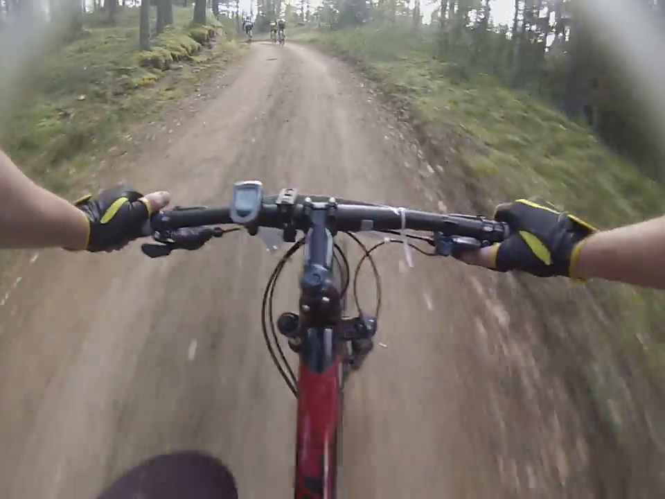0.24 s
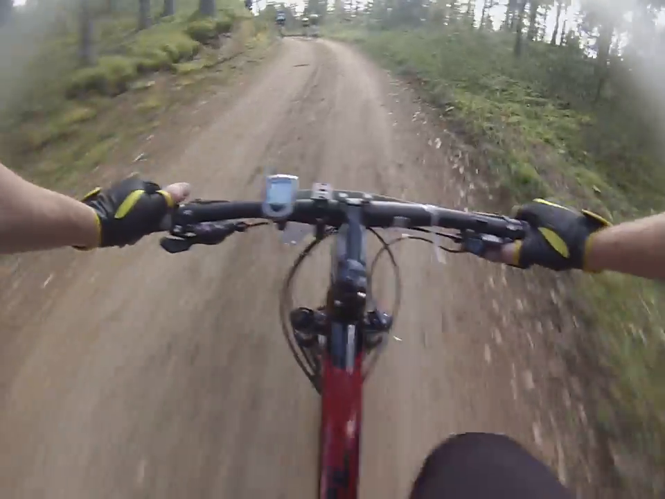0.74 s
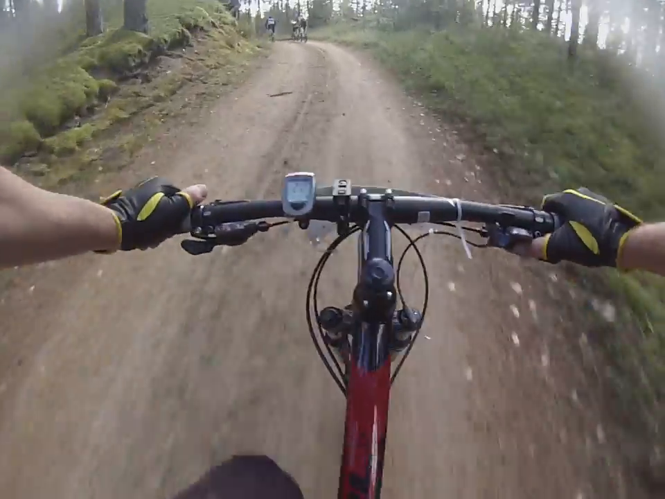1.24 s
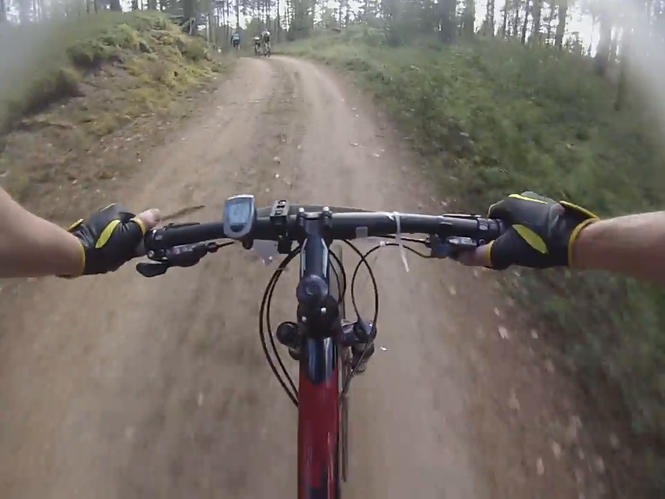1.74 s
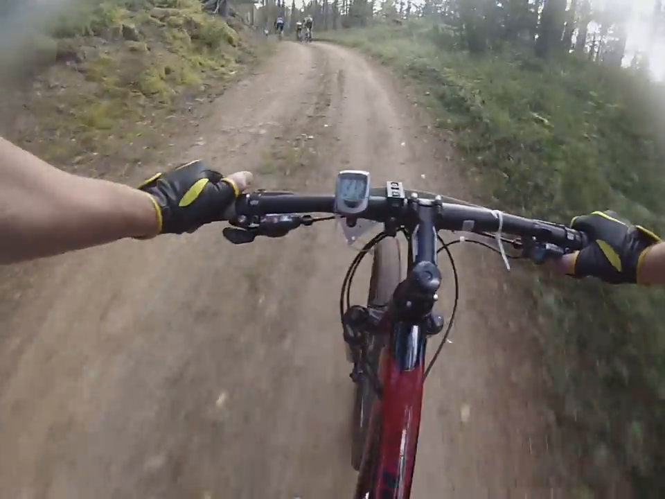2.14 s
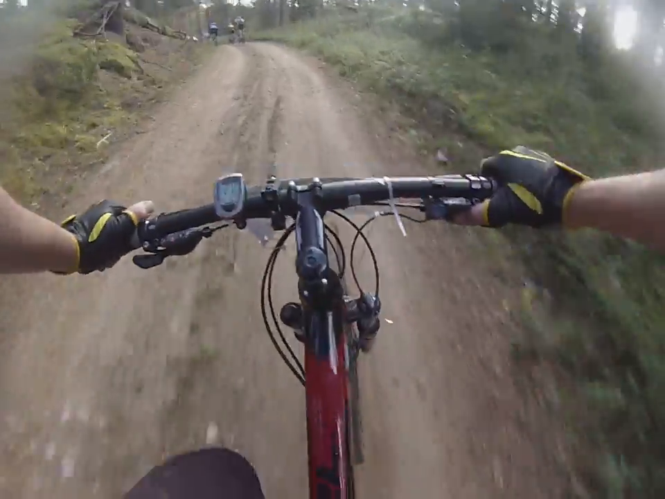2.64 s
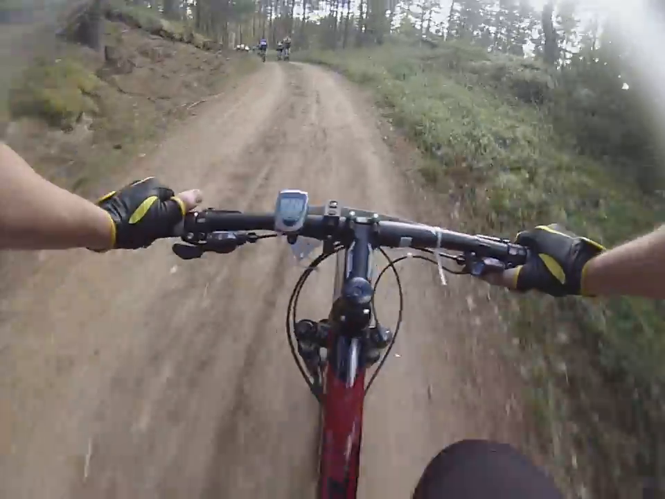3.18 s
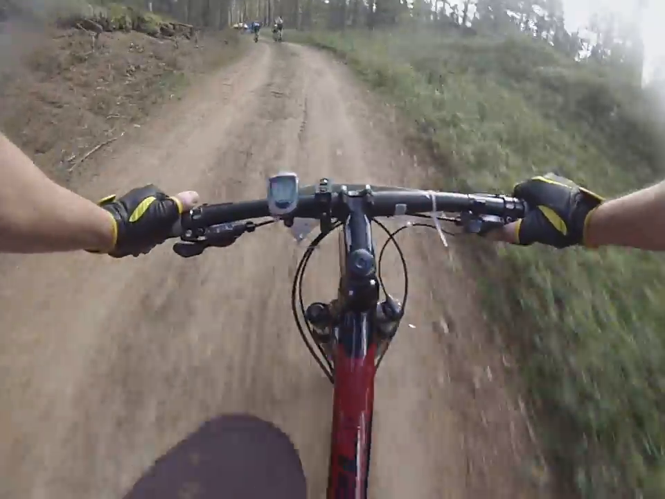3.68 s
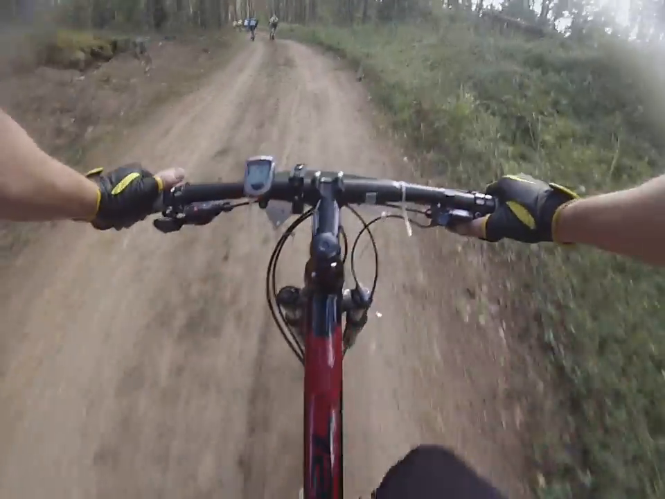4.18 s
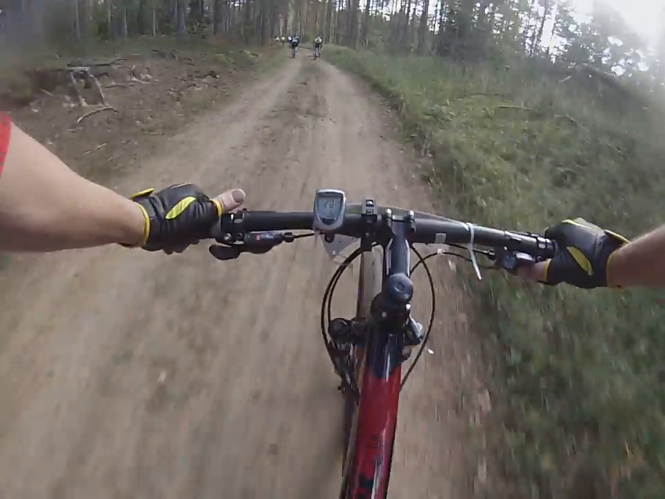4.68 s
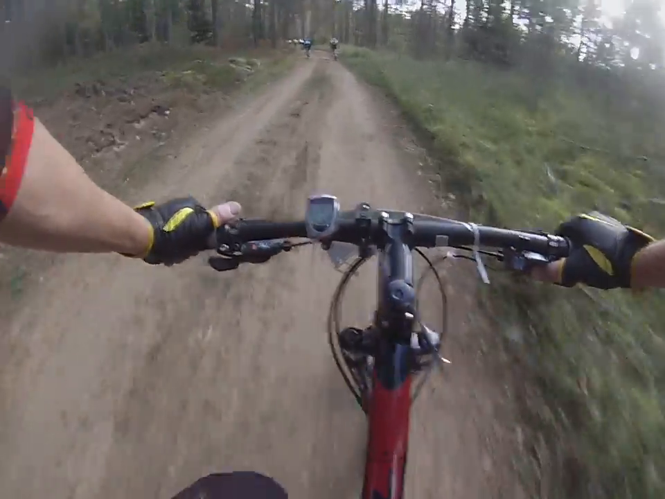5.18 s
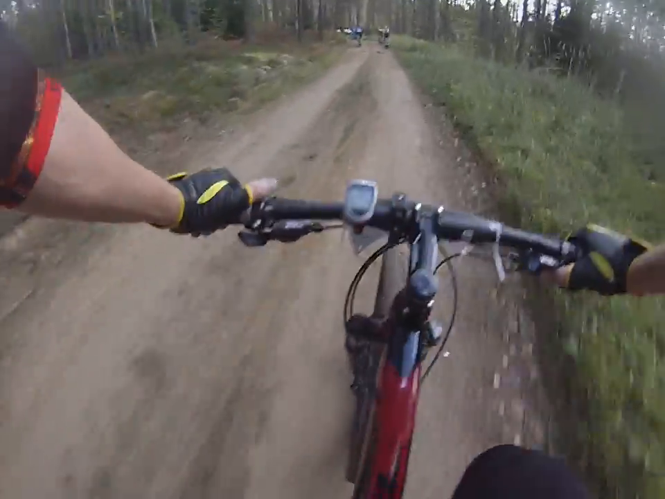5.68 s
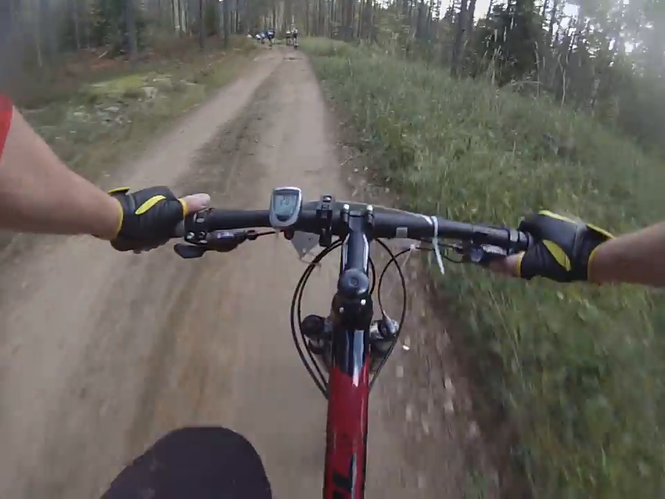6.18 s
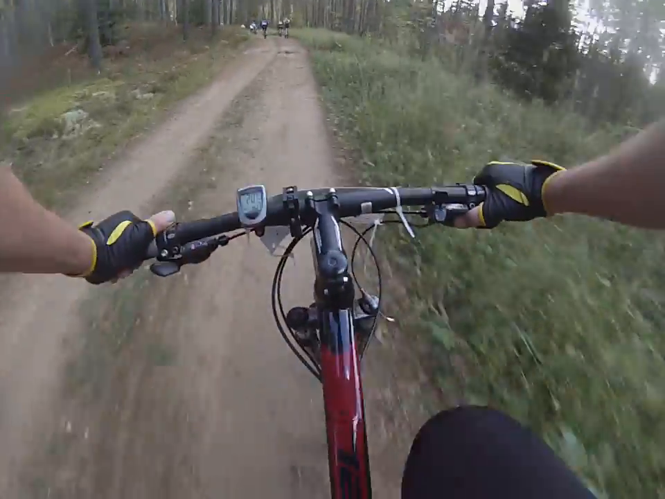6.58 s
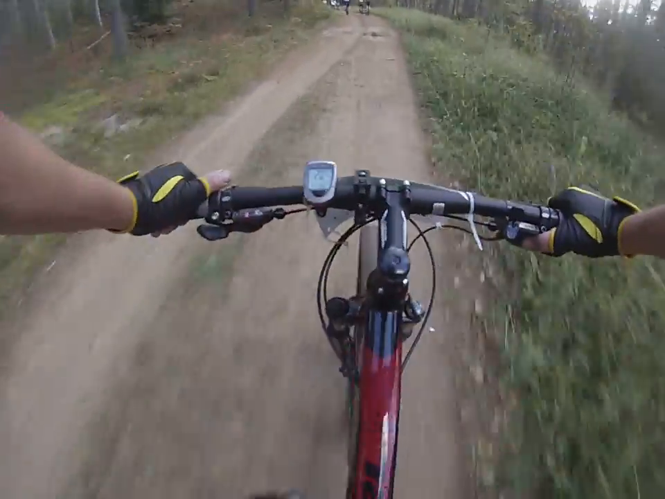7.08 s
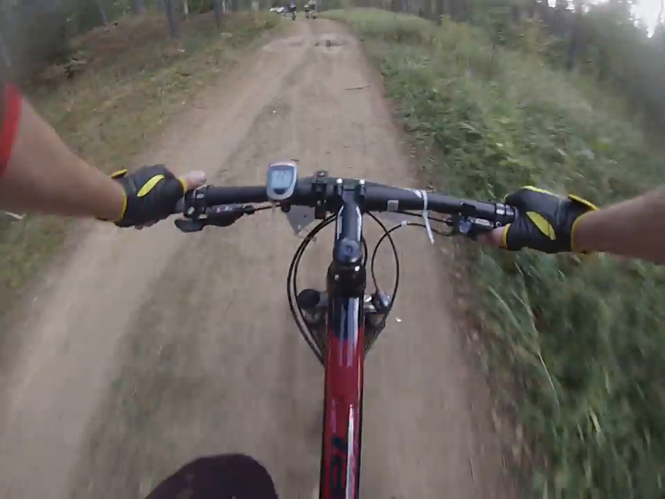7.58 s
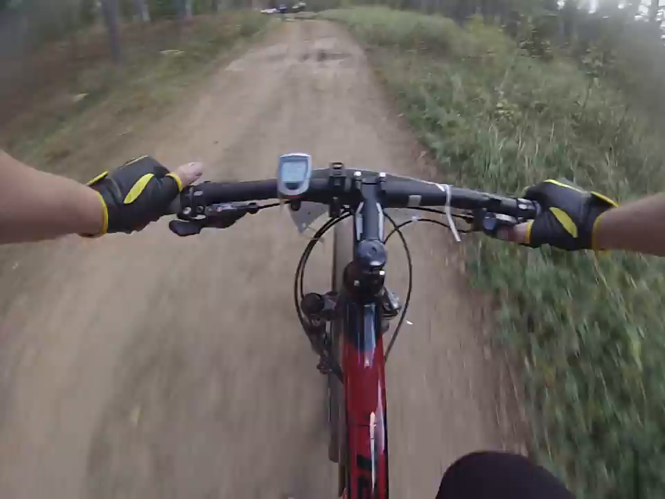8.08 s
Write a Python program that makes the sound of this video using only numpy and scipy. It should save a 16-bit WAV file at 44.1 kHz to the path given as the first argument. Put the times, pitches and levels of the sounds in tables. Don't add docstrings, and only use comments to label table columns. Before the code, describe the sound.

Close, muffled bike ride on a rough forest track: bassy wind pumping, gritty tyre crunch, irregular plastic clacks, stone ticks and faint chain tinks.

```python
import sys
import numpy as np
from scipy import signal
from scipy.fft import rfft, irfft, next_fast_len
from scipy.io import wavfile
from scipy.ndimage import uniform_filter1d, map_coordinates

SR = 44100
rng = np.random.default_rng(int(sys.argv[2]) if len(sys.argv) > 2 else 0)


def to_wav(s):
    ch = np.atleast_2d(s).T
    pcm = np.round(np.clip(ch, -1, 1) * 32767)
    wavfile.write(sys.argv[1], SR, pcm.astype(np.int16))


def elevation(decibels):
    levels = np.asarray(decibels, float)
    return 10 ** (levels / 20)


N = 367353

# [pitch_hz, width_hz, level_db]
SHELL_MODES = [(1453, 303, 3.5), (2175, 307, 3.5), (2720, 303, 0), (3084, 310, -4), (3750, 880, -6.5)]
# [pitch_hz, width_hz, level_db]
RIM_MODES = [(3970, 190, -0.5), (4570, 310, -0.5), (5230, 1160, -5), (7640, 940, -5.5), (11000, 8900, -30)]
# [start_s, peak_db, pitch_hz, ring_ms]
LID_NOTES = [(0.0234, -23, 1330, 1.9), (2.2138, -32, 1220, 2.2), (2.398, -33, 1300, 2.1),
             (3.1346, -16.5, 1356, 2.7), (3.7213, -27, 1530, 2.8), (3.884, -27.5, 1380, 2.3),
             (4.1465, -29, 1070, 3.4), (4.5317, -29, 1600, 2.5), (5.1949, -27, 1340, 2.2),
             (5.4026, -26.5, 1430, 2.5), (5.4489, -22.5, 1310, 2.8), (5.9492, -29.5, 1530, 2),
             (6.1116, -33.5, 1540, 3.1), (6.6064, -28, 1500, 1.8), (7.1505, -21.5, 1330, 2.5),
             (7.2525, -17.5, 1490, 1.5), (7.3772, -30, 1580, 2.1), (7.4706, -26.5, 1460, 3.1),
             (7.5013, -21, 1390, 2.3), (7.9706, -20, 1490, 3.3), (8.1813, -36, 1560, 2.4)]
# [start_s, peak_db, pitch_hz, ring_ms]
SIDE_NOTES = [(0.0233, -20, 2680, 2.4), (1.1155, -25.5, 2760, 1.8), (1.5065, -19, 2130, 1.8),
              (3.1358, -23, 2210, 1.8), (3.1454, -28, 2880, 2.4), (3.74, -29, 2760, 2.2),
              (4.7466, -26, 2940, 2.4), (6.9143, -23.5, 2010, 1.9), (7.0913, -23.5, 1970, 1.9),
              (7.143, -23, 2625, 6.9), (7.2794, -24, 2220, 1.5), (7.4984, -25, 2200, 2.5),
              (7.9703, -36, 2060, 2.2), (8.1605, -28.5, 2780, 1.9)]
FLUTTER_DB = -57


def unit(x):
    return x / np.sqrt(np.mean(x ** 2) + 1e-20)


def curves(rows):
    s, *cols = np.transpose(rows)
    return [np.interp(np.arange(N) / SR, s, c) for c in cols]


def wobble(rate):
    knots = rng.standard_normal(int(N * rate / SR) + 4)
    return map_coordinates(knots, [np.arange(N) * rate / SR])


def swells(times, rises_db, lengths):
    t = np.arange(0, N, 64) / SR
    bells = sum(db * np.exp(-((t - s) / length) ** 2) for s, db, length in zip(times, rises_db, lengths))
    return np.interp(np.arange(N) / SR, t, bells)


def filtered(x, response):
    m = next_fast_len(len(x) + 8192)
    return irfft(rfft(x, m) * response(np.fft.rfftfreq(m, 1 / SR)), m)[:len(x)]


def coloured(x, spectrum):
    hz, db = np.transpose(spectrum)
    return unit(filtered(x, lambda f: elevation(np.interp(np.log(f + 1), np.log(hz + 1), db))))


def resonant(x, modes, top_hz, scatter_db=0):
    hz, width, db = np.transpose(modes)[:, :, None]
    sign = (-1) ** np.arange(len(modes))[:, None]
    gain = elevation(db + np.reshape(scatter_db, (-1, 1))) * sign

    def response(f):
        ring = np.sum(gain * 1j * f * width / (hz ** 2 - f ** 2 + 1j * f * width), axis=0)
        wall = (1 - (f / top_hz) ** 2 + 1.4j * f / top_hz) ** 2
        return ring / wall

    return filtered(x, response)


def grains(per_second, spread_db):
    chance, size, sign = rng.random(N), rng.exponential(size=N), rng.standard_normal(N)
    strength = elevation(spread_db * np.minimum(size, 2.6)) * np.clip(sign, -2, 2)
    return unit((chance < per_second / SR) * strength)


def steady(x, seconds):
    power = np.abs(uniform_filter1d(x ** 2, size=int(seconds * SR)))
    return unit(x / np.sqrt(power + 0.021))


def even(noise, envelope):
    burst = envelope * noise
    for _ in range(2):
        z = rfft(burst)
        flat = irfft(z / (np.abs(z) + 1e-9), len(burst))
        burst = envelope * unit(flat / (envelope + .05))
    return burst * np.linalg.norm(envelope) / np.linalg.norm(burst)


def nulled(x):
    # [pitch_hz, width_hz]
    nulls = [(670, 173), (1690, 120), (3350, 66)]

    def response(f):
        return np.prod([(hz ** 2 - f ** 2) / (hz ** 2 - f ** 2 + 1j * f * width) for hz, width in nulls], axis=0)

    return filtered(x, response)


def preamp_hiss():
    # [pitch_hz, level_db_per_hz]
    preamp = [(300, -36), (3000, 4), (8000, -4), (12000, -8), (15000, -8.5)]
    return elevation(-70.0) * coloured(rng.standard_normal(N), preamp)


def wind_levels():
    # [time_s, pumping_db]
    headwind = [(0, -26.5), (.3, -29.5), (.6, -38), (1.2, -32), (2, -35.5), (2.45, -38), (2.8, -32.5),
                (3.4, -37.5), (3.9, -33.5), (4.3, -33), (4.62, -26), (5, -35), (5.45, -38.5), (5.9, -33.5),
                (6.85, -34.5), (7.3, -23), (7.9, -29), (8.33, -31)]
    # [centre_s, pumping_rise_db, flutter_rise_db, half_length_s]
    gusts = [(0, 16, 28, 0.01), (0.26, 10, -16, 0.025), (0.373, 5, 16, 0.039), (0.52, 9.5, 5.5, .04),
             (1.931, 3, -6, 0.035), (4.005, 3, 8, 0.053), (5.09, -1, -8, 0.081), (5.23, 1.5, 11, 0.042),
             (6.6, 12.5, 13, 0.041), (6.977, 4, 8, 0.026), (7.837, 9.5, -8, 0.019),
             (1.495, -0.5, 13, 0.085), (1.636, 10.5, 5.5, 0.038), (1.849, 9.5, 12.5, 0.037),
             (2.223, 7, 6, 0.065), (2.59, 11, -4, 0.012), (2.94, 4.5, 12.5, 0.035),
             (3.164, 9.5, 8.5, 0.079), (3.319, 18.5, 15.5, 0.018), (3.541, 11.5, 0, 0.033),
             (3.677, 3.5, 10, 0.045), (4.158, -25, 16, 0.042), (4.515, 3, 9, 0.095), (4.785, 7, 14, 0.02),
             (5.159, 10.5, 16, 0.027), (5.325, 13.5, 7, 0.053), (5.723, 16, -1.5, 0.055),
             (6.127, 15, 11, 0.035), (6.313, 12.5, 9.5, 0.061), (6.506, 17.5, 12, 0.054),
             (7.342, -6, 16.5, 0.058), (7.478, -0.5, 9, 0.081), (7.64, -11, 8, 0.046),
             (7.7, -3, 13.5, 0.029), (7.93, 7, 6, 0.04), (8.17, 9.5, 3.5, 0.035)]
    calm_db, = curves(headwind)
    s, pump_db, flap_db, length = np.transpose(gusts)
    pumping_db = calm_db + swells(s, pump_db, length)
    flutter_db = FLUTTER_DB + 0.11 * (calm_db + 40.0) + swells(s, flap_db, length)
    return pumping_db, flutter_db


def wind():
    # [pitch_hz, level_db_per_hz]
    pumping = [(2, -30), (5, -6), (16, 1), (30, -2), (38, -7.5), (50, -24.5), (90, -88)]
    # [pitch_hz, level_db_per_hz]
    flapping = [(25, -15), (45, -3), (60, -1.5), (90, -5), (150, -15), (220, -30), (400, -69), (999, -120)]
    pumping_db, flutter_db = wind_levels()
    swings = steady(coloured(rng.standard_normal(N), pumping), seconds=0.086)
    lumps = elevation(2.56 * wobble(23) + 2.8 * wobble(60))
    flutter = unit(lumps * steady(coloured(rng.standard_normal(N), flapping), seconds=0.061))
    return elevation(pumping_db) * swings + elevation(flutter_db + 4.0) * flutter


def lurches():
    # [centre_s, peak_db, half_length_s]
    bumps = [
        (3.147, -15, 0.033),
        (4.167, -11.5, 0.027),
        (7.112, -16.5, 0.023),
        (7.603, -12, 0.02),
        (7.653, -11.5, 0.021),
    ]
    t, lurch_hz = np.arange(N) / SR, 23.1
    out = np.zeros(N)
    for s, db, length in bumps:
        bell = np.exp(-((t - s) / length) ** 2)
        out += elevation(db) * bell * np.cos(2 * np.pi * lurch_hz * (t - s))
    return out


def jolts():
    # [centre_s, peak_db, pitch_hz, half_length_s]
    ruts = [(0.349, -42, 114, 0.021), (0.728, -47, 118, 0.015), (1.091, -40.5, 75, 0.018),
            (1.471, -47, 120, 0.013), (1.84, -46, 130, 0.013), (2.579, -39, 80, 0.024),
            (4.004, -47, 70, .02), (4.051, -44.5, 85, 0.025), (4.181, -34, 60, 0.041),
            (4.422, -44, 90, .02), (5.09, -39, 65.3, 0.019), (5.163, -34.5, 62, 0.028),
            (5.968, -42, 62, 0.025), (7.595, -30, 50, 0.022), (5.453, -39, 111, 0.0074),
            (5.885, -38, 73, 0.035), (5.952, -41.5, 112, 0.014), (6.238, -35.5, 91, 0.013),
            (6.357, -40, 70, 0.018), (6.471, -35, 60, 0.021), (6.967, -43, 81, .022), (7.225, -41, 75, .02),
            (7.467, -26, 61, 0.03), (7.626, -36, 60, 0.019), (7.676, -39, 65, 0.03), (7.98, -41, 65, .022)]
    out, t = np.zeros(N + 8192), np.arange(-4096, 4096) / SR
    for s, db, hz, length in ruts:
        swing = np.exp(-(t / length) ** 2) * np.sin(2 * np.pi * hz * t)
        out[round(s * SR):][:len(t)] += elevation(db) * swing
    return out[4096:][:N]


def chain():
    # [start_s, peak_db, pitch_hz]
    tinks = [
        (1.475, -60, 10000),
        (4.2251, -50, 11000),
        (5.3832, -52, 9850),
        (5.4164, -50, 9750),
        (5.5174, -44, 11200),
        (6.026, -54, 10000),
        (6.746, -49, 9620),
        (6.912, -47.5, 10600),
    ]
    out, t = np.zeros(N + 1024), np.arange(1024) / SR
    for s, db, hz in tinks:
        burst = np.exp(-t / 0.0012) * rng.standard_normal(len(t))
        tink = resonant(burst, [(hz, 900, 0), (1.42 * hz, 1100, -4)], top_hz=17000)
        out[round(s * SR):][:len(t)] += elevation(db) * tink / np.max(np.abs(tink))
    return out[:N]


def contacts():
    # [start_s, shell_energy_db, thud_over_shell_db, hardness_db, length_ms]
    thumps = [(0.024, -1.5, -4, -1, 3.9), (0.815, -15, 5, -37, 3.5), (1.506, -11, -8, 5, 3.1),
              (1.5195, -9.5, 1, -1, 3.2), (2.2131, -9.5, 0, -4.5, 2.94), (2.299, -29.5, 14.5, 5, 1.9),
              (2.3957, -17.5, 1.5, -9, 4.6), (3.1341, 0, -5, 1, 4.8), (3.7216, -7, -2.5, -11, 1.34),
              (3.883, -13.5, 2.5, -18, 5.4), (4.0639, -15.5, 3.5, -3.5, 5.9), (4.147, -11.5, -7, -11, 12),
              (4.532, -6.5, 0, -3.5, 3.45), (6.113, -14, 6, -8, 5.4), (6.4828, -25, 5, -16, 13),
              (6.606, -4.5, -2, -6.5, 3.66), (6.7125, -30.5, 14.5, -4, 5), (6.7763, -20.5, 1.5, -12, 3.9),
              (7.2783, -0.5, -5.5, 2.5, 5.2), (7.497, -9, -9, 5, 22), (7.588, -19.5, -24, -9, 5.2),
              (7.8933, -19.5, -6.5, -7, 3.6), (7.97, -5, -4, -6, 4), (8.117, -22, 0.5, -19, 2.7)]
    # [start_s, shell_energy_db, hardness_db, rim_tick_over_shell_db, length_ms]
    stones = [(1.1153, -10, 6, -19, 2.2), (2.704, -16.5, -11, -32, 2.15), (2.883, -18.5, -8, -21, 6),
              (3.1455, -11, 4, -12, 4.2), (3.739, -14, 5.5, -20, 4.2), (4.7465, -8.5, 11, -14, 1.97),
              (4.7598, -16.5, 3, -23, 2.9), (5.196, -9, 0.5, -30, 4.6), (5.226, -14.5, 3, -15.5, 6.3),
              (5.403, -16.5, 2, -11, 8.1), (5.449, -14, -1, -13, 2.4), (5.7756, -11.5, -1, -23, 2.2),
              (6.0385, -19.5, -4, -23, 8.1), (6.747, -10, 4.5, -14.5, 6.9), (6.9128, -21, 6, -7, 9.3),
              (7.0905, -13.5, 3, -17, 4.6), (7.143, -11.5, 7, -20, 17), (7.253, -5, 4, -14, 2.6),
              (7.2604, -16, -3, -28, 3.6), (7.3779, -17.5, 1, -20, 0.83), (7.466, -14.5, 3, -23, 7.6),
              (8.16, -12, 0, -33, 2.4), (8.174, -16.5, 5, -27, 2.5), (8.1813, -13, 3, -35, 2.25)]
    # [start_s, shell_energy_db, hardness_db]
    rattles = [(0.6523, -26, -2), (0.698, -24, 4), (1.414, -22.5, -1), (2.2866, -18.5, -2), (2.31, -23, 9),
               (2.7158, -23.5, 10), (2.731, -27, -4), (3.301, -24.5, -2), (3.945, -22.5, 2),
               (4.0348, -26, -11), (5.187, -21, -11), (5.209, -24, -3), (5.217, -17, -2), (5.462, -20.5, 5),
               (5.5806, -20, -37), (5.904, -20, 5), (5.9138, -22, 2), (5.946, -24, 3), (6.37, -24.5, -3),
               (6.497, -20, -8), (6.506, -17, -8), (6.572, -22.5, -7), (6.797, -19.5, 4), (6.881, -24, 0),
               (6.955, -23, 1), (6.9667, -21, -11), (7.317, -22, -10), (7.607, -20, -6), (7.664, -26, -12),
               (7.728, -29, -6), (7.86, -22, -9), (8.067, -26, -5), (7.014, -28, -5), (6.279, -27, 3),
               (6.5316, -24, -6), (5.154, -25, -2), (5.164, -26, 0), (5.724, -30, 0), (5.805, -23.5, -1),
               (4.812, -27, -6), (4.44, -25, -11), (3.9152, -26, -2), (2.332, -27, 1), (1.924, -29, -14),
               (2.1125, -30, -1), (2.5636, -27.5, -2), (0.238, -28, -20), (7.524, -30, -2),
               (7.94, -24.5, -17.5), (8.0017, -22, 4)]
    # [start_s, tick_energy_db, length_ms]
    ticks = [(.101, -42, 2.5), (.122, -46, 1.9), (0.718, -34.5, 6.9), (.926, -38.5, 4.1),
             (3.1121, -33, 2.9), (4.1427, -31, 1.9), (4.225, -33, 5.4), (4.769, -37, 2.5),
             (5.3133, -35, 7.1), (5.383, -28.5, 20), (5.417, -38, 4.9), (5.254, -44, 3), (5.473, -33, 5.7),
             (5.518, -32.5, 4.3), (6.027, -29, 2.1), (6.17, -41, 2.7), (6.341, -38, 4.4),
             (6.3607, -44, 1.6), (6.448, -40, 2.1), (7.1043, -33, 8.8), (7.187, -28.5, 6.3),
             (7.4853, -32, 8.5)]
    rows = []
    for s, db, thud, hard, ms in thumps:
        rim = np.clip(-13 + 6.4 * hard, -46, -16)
        rows.append((s, db, hard, db + thud, db + rim, ms))
    for s, db, hard, rim, ms in stones:
        rows.append((s, db, hard, db - 22.5, db + rim, ms))
    for s, db, hard in rattles:
        rows.append((s, db, hard, db - 17, db - 20, 5.74))
    for s, db, ms in ticks:
        rows.append((s, db + 8.5, 2.5, db - 11, db, ms))
    return sorted(rows)


def knocks():
    # [pitch_hz, width_hz, level_db]
    mount_modes = [(234, 290, 1.5), (440, 342, 1.5), (840, 140, -0.5), (1310, 150, -5)]
    out, t = np.zeros(N + 2048), np.arange(2048) / SR
    note_starts = [row[0] for row in [*LID_NOTES, *SIDE_NOTES]]
    for s, shell_db, hard_db, thud_db, tick_db, ms in contacts():
        shaking, colour_db = rng.standard_normal((3, len(t))), rng.normal(0, 1.93, (3, 5))
        onset = 1 - np.exp(-t / 0.000067)
        contact = onset * (np.exp(-(t / (0.00063 * ms)) ** 2) + 0.35 * np.exp(-t / (0.001 * ms)))
        shove = np.sin(np.pi * np.clip(t / 0.00072, 0, 1))
        push = shove + 0.5 * even(shaking[1], contact)
        taps = np.zeros(len(t))
        taps[[0, round(.0004 * ms * SR)]] = 1, -.8
        blow = 22 / ms * taps + even(shaking[0], contact)
        upper_db = (hard_db - .6) * np.array([0.019, 0.72, 1.48, 1.94, 1.7])
        sung = min(abs(s - start) for start in note_starts) < 4e-3
        shell = resonant(blow, SHELL_MODES, 2810, colour_db[0] + upper_db)
        mount = resonant(push, mount_modes, 2000, colour_db[1, :len(mount_modes)])
        rim = resonant(even(shaking[2], contact ** 2.1), RIM_MODES, 15400, colour_db[2])
        for db, ring in [(shell_db - 0.5 * sung, shell), (thud_db, mount), (tick_db, rim)]:
            out[round(s * SR):][:len(t)] += elevation(db) * ring / np.linalg.norm(ring)
    return out[:N]


def panel_notes():
    # [start_s, peak_db, pitch_hz, ring_ms]
    clips = [
        (0.022, -19, 900, 2.6),
        (2.212, -31.5, 428, 2.6),
        (2.395, -27.5, 890, 1.4),
        (3.133, -22, 372, 3.4),
        (6.605, -31.5, 342, 3.4),
        (7.277, -17.5, 840, 2.8),
        (7.467, -35, 458, 3.9),
        (7.9692, -18, 1160, 2),
    ]
    # [start_s, peak_db, pitch_hz, ring_ms]
    edges = [
        (0.0242, -22.5, 3150, 2.3),
        (1.5187, -37, 3100, 2.2),
        (3.1339, -22.5, 3080, 2),
        (7.279, -23, 3080, 2.2),
    ]
    # [start_s, peak_db, pitch_hz, ring_ms]
    straps = [
        (0.816, -44, 158, 3.8),
        (2.296, -59, 251, 2.4),
        (4.531, -27, 151, 4.8),
        (6.111, -37, 191, 3.5),
    ]
    # [start_s,
    # peak_db, pitch_hz, ring_ms]
    pings = [(.0236, -27, 7680, 0.83), (.6529, -37, 1610, 3.6), (2.8833, -29, 1510, 2.5),
             (3.1343, -18, 870, 2.2), (4.0635, -30.5, 1240, 3), (.815, -32, 2350, .8),
             (1.115, -42, 2200, 2.2), (4.747, -27, 2540, 2.5), (4.7465, -30.5, 1390, 2.5),
             (1.5062, -28.5, 2820, 2), (2.396, -31, 1990, 1.7), (5.449, -23.5, 2320, 2.5),
             (6.113, -45, 2510, 2), (7.2785, -24, 2680, 2.1), (7.2785, -21, 1350, 2.2),
             (7.9703, -27, 2610, 2.4)]
    # [start_s, peak_db, pitch_hz, ring_ms]
    glass = [
        (0.0233, -30, 4800, 1.1),
        (3.1338, -32, 5470, 1.5),
        (5.4485, -38, 5280, 1.5),
        (6.9112, -32, 5970, 1.2),
        (7.1422, -35, 5060, 1.5),
        (7.1856, -35.5, 5900, 1.5),
        (7.2779, -38, 4900, 1.2),
        (7.4845, -38, 5100, 3.5),
        (7.4974, -32, 5030, 1.7),
    ]
    out, t = np.zeros(N + 2048), np.arange(2048) / SR
    for s, db, hz, ms in [*LID_NOTES, *SIDE_NOTES, *clips, *edges, *straps, *pings, *glass]:
        life = t / (ms / 1000)
        shape = (1 - np.exp(-life / 0.16)) * np.exp(-life)
        note = shape / shape.max() * np.sin(2 * np.pi * hz * t)
        out[round(s * SR):][:len(t)] += elevation(db - 5.5) * note
    return out[:N]


def tyre_levels():
    # [time_s, crunch_db]
    track = [(0, -55.5), (.8, -57), (1.3, -55.5), (2.4, -58), (3, -56.5), (3.6, -56.5), (4.1, -54.5),
             (4.5, -55.5), (4.95, -58.5), (5.25, -54.5), (5.57, -58.5), (6.3, -55.5), (6.95, -57.5),
             (7.4, -56), (7.6, -52), (7.85, -54.5), (8.33, -54.5)]
    # [centre_s, crunch_rise_db, half_length_s, fine_grit_share_of_rise]
    patches = [(0.395, 5.5, 0.018, 0.62), (2.246, 7, 0.02, .7), (2.522, 2, 0.045, 1.6),
               (2.737, 5, 0.049, 0.49), (3.746, 2, 0.023, .7), (4.19, 3.5, 0.16, 1.7),
               (5.174, 5, 0.095, 1.3), (5.318, 7.5, 0.022, 0.86), (5.41, 10, 0.055, 1.24),
               (5.72, 11.5, 0.069, 0.93), (5.933, 7.5, 0.048, 0.62), (6.02, 7, 0.037, 0.91),
               (6.121, 7, 0.025, .4), (6.352, 6, 0.041, 1.2), (6.496, 7.5, 0.061, 1.1),
               (6.597, 7, 0.012, 0.91), (6.689, 7.5, 0.031, .8), (6.8, 6.5, 0.032, .6),
               (7.051, 6.5, 0.024, .6), (6.19, -5.5, 0.023, .6), (5.788, 6, 0.021, 0.71),
               (7.101, 14.5, 0.011, .5), (7.167, 14, 0.05, 0.72), (7.276, 8, 0.044, 0.4),
               (7.502, 12, 0.038, 0.37), (8.162, 3, 0.076, .3)]
    packed_db, = curves(track)
    s, rise_db, length, fine = np.transpose(patches)
    grit_db = -68.5 + 0.46 * (packed_db + 56.5) + swells(s, fine * rise_db, length)
    return packed_db + swells(s, rise_db, length), grit_db


def tyres():
    # [pitch_hz, level_db_per_hz]
    grit = [(1000, -40), (3000, -2.5), (5000, -2), (6300, -7.5), (7600, -9), (9000, -14), (12000, -21.5),
            (15000, -33)]
    # [pitch_hz, level_db_per_hz]
    rolling = [(60, -39), (165, 1.5), (240, -1.5), (318, 1.5), (410, -5), (700, -6.5), (1200, -10.5),
               (2500, -66)]
    # [centre_s, rumble_rise_db, half_length_s]
    drones = [
        (1.947, 3.5, 0.13),
        (2.177, 7, 0.026),
        (7.162, 5, 0.087),
        (7.513, 3.5, 0.087),
        (7.626, 5, 0.11),
    ]
    crunch_db, grit_db = tyre_levels()
    clumps = 0.8 * wobble(25) + 2.0 * wobble(80)
    loose = elevation(.5 * (crunch_db + 54.5))
    clumps = clumps * np.clip(0.55 * loose, .6, 1.6)

    gravel = rng.standard_normal(N) + 0.85 * loose * grains(per_second=600, spread_db=3.5)
    gravel = gravel / np.hypot(1, 0.61 * loose)
    crunch = unit(elevation(clumps) * resonant(gravel, SHELL_MODES, top_hz=3600))

    fine = rng.standard_normal(N) + 0.75 * loose * grains(per_second=550, spread_db=2.5)
    fine = fine / np.hypot(1, 0.33 * loose)
    rim_share = 0.26 * np.clip(loose - 1, 0, 1)
    rim = unit(resonant(fine, RIM_MODES, top_hz=13700))
    hiss = unit(elevation(1.3 * clumps) * (coloured(fine, grit) + rim_share * rim))

    rumble_db = -61.5 + 0.44 * (crunch_db + 56.5) + 1.2 * wobble(12) + 0.83 * clumps
    rumble_db = rumble_db + 0.036 * (wind_levels()[1] - FLUTTER_DB) + swells(*np.transpose(drones))
    rumble = coloured(rng.standard_normal(N), rolling)
    return elevation(crunch_db - 1.32) * crunch + elevation(grit_db - 1.0) * hiss + elevation(rumble_db) * rumble


def scene():
    air_and_frame = wind() + lurches() + jolts()
    shell = nulled(knocks() + panel_notes())
    return (air_and_frame + tyres() + shell + chain())[None]


def band_limit(x):
    return signal.sosfilt(signal.butter(12, 15300, fs=SR, output="sos"), x)


def record(dry):
    mix = dry + preamp_hiss()
    return band_limit(mix)


dry = scene()
out = record(dry)
to_wav(out)
```